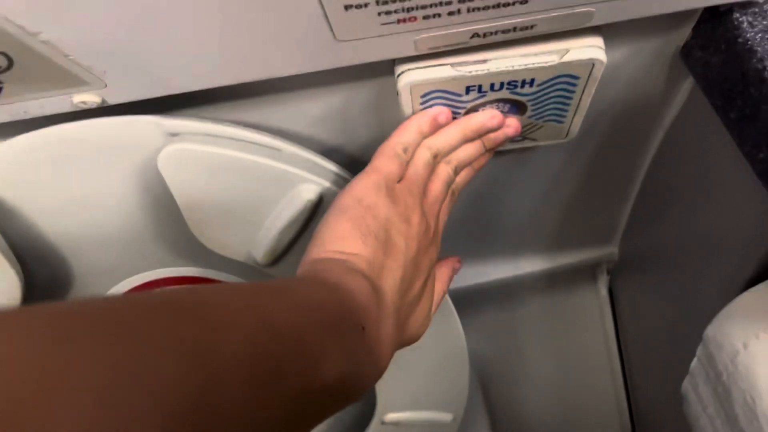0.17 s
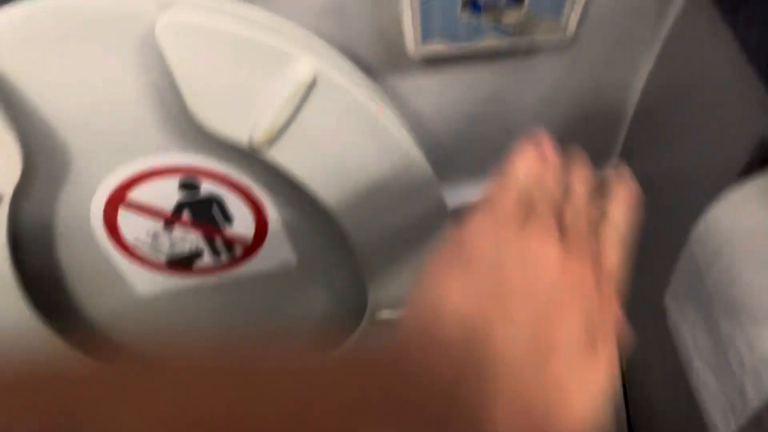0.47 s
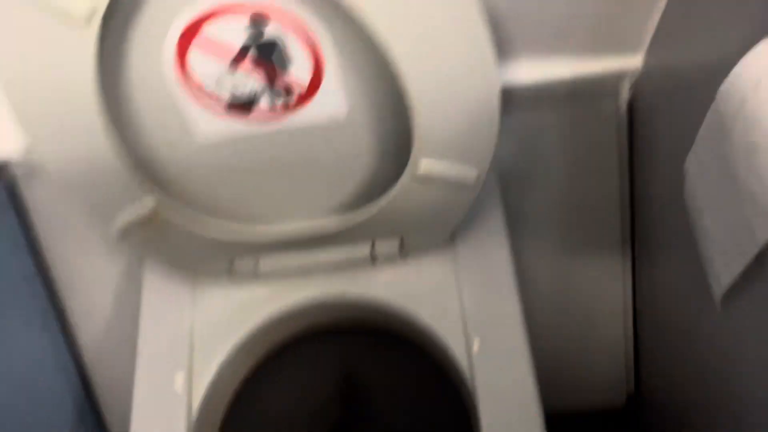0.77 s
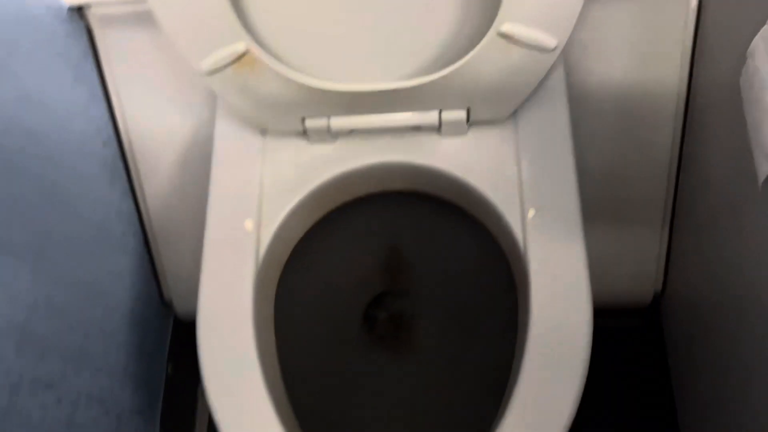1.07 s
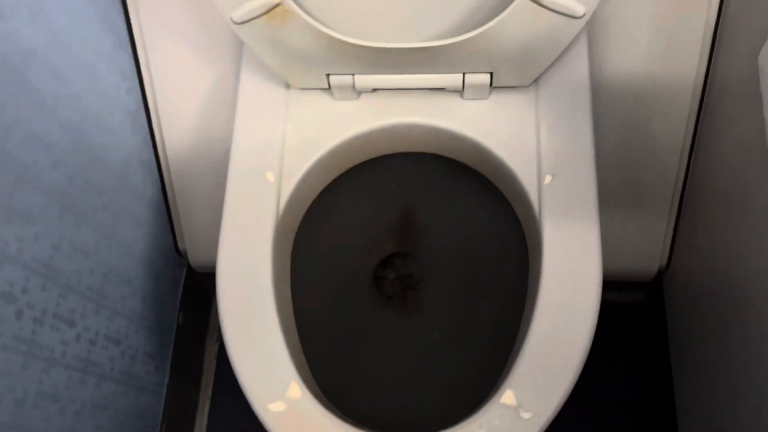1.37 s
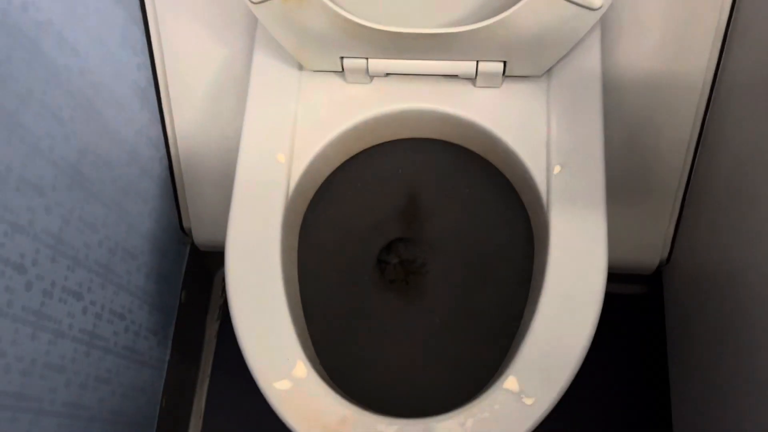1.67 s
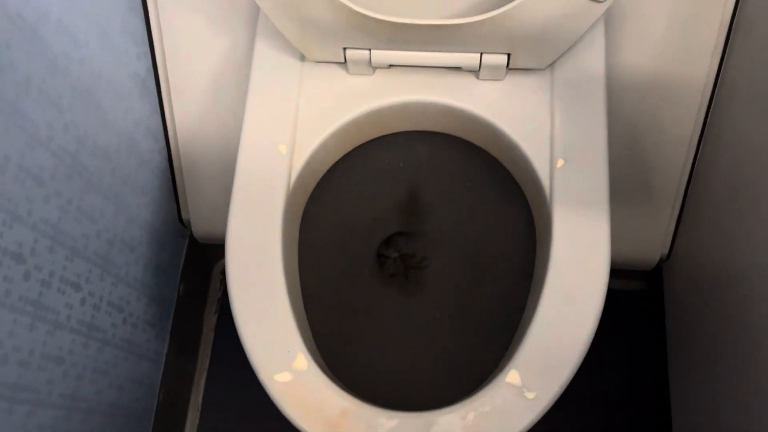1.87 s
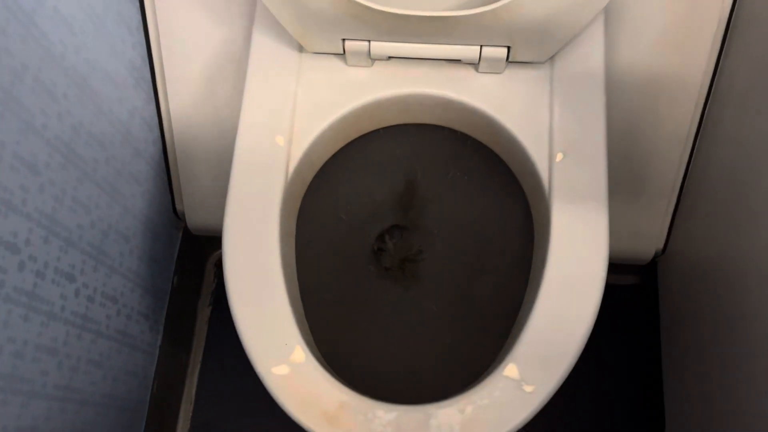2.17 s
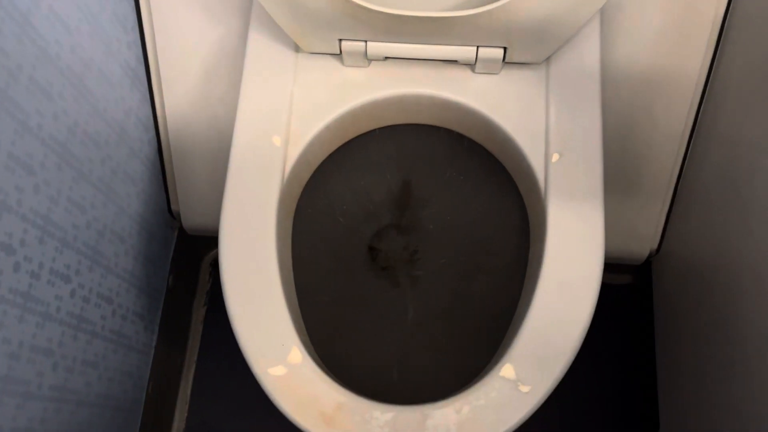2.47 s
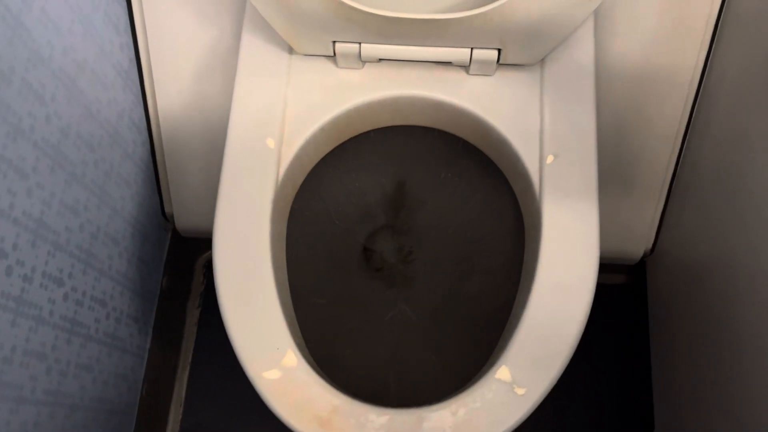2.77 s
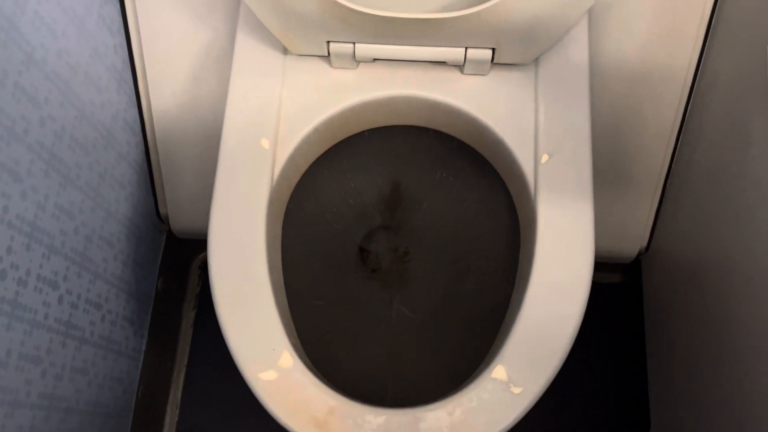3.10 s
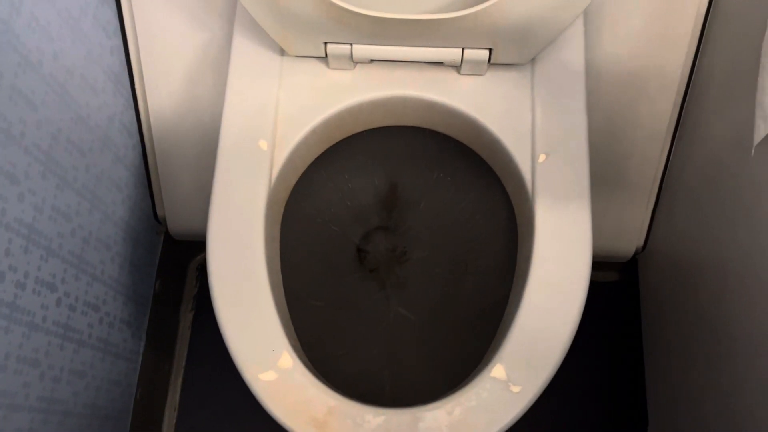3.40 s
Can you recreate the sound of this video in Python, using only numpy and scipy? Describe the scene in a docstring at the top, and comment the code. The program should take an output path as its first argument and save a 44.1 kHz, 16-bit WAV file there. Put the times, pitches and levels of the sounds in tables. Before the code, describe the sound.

Vacuum toilet flush close to the microphone in a small airplane washroom; after a button press and a droning wait, a valve knocks, water hisses, the drain gulps, air rushes, and a valve thuds.

```python
"""A low cabin drone is heard first; then a vacuum toilet flushes in a small aircraft lavatory.
A button clicks in and out, the rinse valve knocks open and water sprays; the drain gulps,
air rushes down the pipe, and a valve thuds near the end. Drone, spray, air and gulp are
filtered noise with flickering bands; button and valve are decaying sines under noise bursts."""
import sys
import numpy as np
from scipy import signal
from scipy.fft import rfft, irfft
from scipy.io import wavfile
from scipy.ndimage import uniform_filter1d

SR = 44100
rng = np.random.default_rng(int(sys.argv[2]) if len(sys.argv) > 2 else 0)


def decibels_to_gain(level_db):
    """Convert a level in decibels to a linear amplitude gain (20 dB per decade)."""
    exponent = np.asarray(level_db, float) / 20
    return 10 ** exponent


def wav_out(sig):
    """Save sig, one row per channel (or a flat mono array), as 16-bit PCM at SR to the path in sys.argv[1]."""
    wavfile.write(sys.argv[1], SR, np.round(np.clip(np.atleast_2d(sig).T, -1, 1) * 32767).astype(np.int16))


N = 156114
TIME_S = np.arange(N) / SR
HZ = np.fft.rfftfreq(N, 1 / SR)

# Spectra give relative level.
# cabin spectrum: (frequency [Hz], level [dB per Hz])
DRONE_SPECTRUM = [(25, -10), (36, -5), (48, -8), (75, -1), (110, -7.5), (160, -12), (260, -24),
                  (420, -24.5), (700, -28), (1000, -33.5), (1400, -31.5), (2200, -39.5), (3500, -45),
                  (5000, -59.5), (7000, -63.5), (10000, -65), (14000, -76.5)]
# cabin resonances: (frequency [Hz], width [Hz], gain [dB])
CABIN_RESONANCES = [(80.9, 22.6, 7.5), (426, 22, 8), (1350, 180, 4)]
DRONE_DB, DRONE_WAVER_DB = -12.5, 0.6
BUMP_S, BUMP_DB, BUMP_HZ, BUMP_T60_S = 3.02, -0.5, 56, 0.7

# button pressed, let go: (time [s], touch level [dB], switch snap level [dB])
BUTTON_CLICKS = [(0.0565, -22.5, -20), (0.3004, -29.5, -42)]
# panel and cap modes: (frequency [Hz], level [dB], t60 [s])
BUTTON_MODES = [(210.7, 6.5, 0.45), (284, 0, 0.15), (480, -3, 0.055), (600, -5.5, 0.1), (810, -11, 0.079),
                (5100, -1, 0.015)]
# plastic crack spectrum: (frequency [Hz], level [dB per Hz])
BUTTON_CRACK_SPECTRUM = [(500, -1), (1000, -19), (2000, -15), (3500, -18.5), (5500, -24), (8000, -28),
                         (11000, -47), (14500, -60.5)]
BUTTON_CRACK_GAIN_DB, BUTTON_CRACK_T60_S, BUTTON_SNAP_DELAY_S = 6, 0.075, 0.009

# valve knocks: (time [s], ring level [dB], crack level [dB], air spit level [dB])
VALVE_KNOCKS = [(1.7099, -4, -18.5, -23), (3.413, 8.5, -6.5, -48)]
# valve housing modes: (frequency [Hz], level [dB], t60 [s])
VALVE_MODES = [(146, -12.5, 0.32), (314.6, -4, 0.12), (384, -2.5, 0.064), (793, -10.5, .08),
               (1444, -10, .06), (2300, -28, 0.058)]
# valve crack spectrum: (frequency [Hz], level [dB per Hz])
VALVE_CRACK_SPECTRUM = [(400, 7.5), (900, -1), (2000, -5.5), (3500, -10.5), (5500, -15.5), (8000, -16)]
# air spit spectrum: (frequency [Hz], level [dB per Hz])
VALVE_SPIT_SPECTRUM = [(6000, -7), (8000, -12), (9800, 6.5), (12000, -17), (15000, -22)]
VALVE_PUSH_S, VALVE_CRACK_T60_S, VALVE_SPIT_T60_S = 0.009, 0.09, 0.06

# spray force: (time [s], level [dB])
RINSE_FORCE = [(1.74, -49.5), (1.77, -44), (1.87, -31), (1.96, -21.5), (2.07, -21), (2.14, -24), (2.3, -20),
               (2.35, -16), (2.39, -24.5), (2.55, -22.5), (2.72, -21), (2.9, -23.5), (3.4, -25.5),
               (3.54, -27.5)]
# spray spectrum: (frequency [Hz], level [dB per Hz])
SPRAY_SPECTRUM = [(1500, -11.5), (2300, -8), (3300, -8), (4700, -10.5), (6500, -7.5), (8500, -4.5),
                  (11000, -6.5), (13500, -9.5), (15500, -11)]

# air flow: (time [s], level [dB])
SUCTION_FLOW = [(2.1, -51), (2.2, -29.5), (2.3, -19.5), (2.5, -15), (2.7, -16), (2.9, -18), (3.4, -20),
                (3.54, -21.5)]
# moving air spectrum: (frequency [Hz], level [dB per Hz])
AIR_SPECTRUM = [(200, -14), (420, -8.5), (650, -3.5), (800, -2.5), (900, -27), (1050, -1), (1600, -7.5),
                (2300, -13), (2600, -11.5), (3600, -17.5), (3900, -32), (4600, -20.5), (6000, -19.5),
                (9000, -24)]
# bowl and pipe resonances: (frequency [Hz])
PIPE_HZ = [235, 412, 1000, 1495, 1970, 2270, 2870, 3190, 3600, 4830, 6000, 6380]
# the same resonances, in order: (width [Hz], gain [dB])
PIPE_WIDTH_GAIN = [(50.7, 8), (21.2, 12.5), (34.3, 10), (34.8, 11), (79.6, 8), (45, 11), (44.8, 3),
                   (55, 11), (40.3, 9.5), (50.6, 14.5), (60, 8.5), (80, 6.5)]

# water torn into the drain: (time [s], level [dB], centre [Hz])
GULP_PATH = [(2.28, -50, 3200), (2.312, -19, 2800), (2.33, -7, 2480), (2.36, -1.5, 1670),
             (2.385, 0.5, 1020), (2.41, -4, 690), (2.435, 0.5, 600), (2.452, -5, 600), (2.472, -1, 457),
             (2.5, -8, 343), (2.53, -28, 298)]
# gulp spectrum: (frequency [Hz], level [dB per Hz])
GULP_SPECTRUM = [(170, 9), (230, 1), (320, -2.5), (700, -5), (1200, -5), (2200, -12.5), (3700, -17.5),
                 (4200, -20.5), (7000, -16.5), (14000, -24.5)]
GULP_HIGH_FALL_DB_PER_OCT, GULP_LOW_FALL_DB_PER_OCT, GULP_LUMP_DB = 4.5, 5, 2.5

# channel phase and likeness: (frequency [Hz], right lead [half-turns], likeness [0-1]); stretches at whole
# half-turns with full likeness keep the two sides exactly in or out of step
PORTS = [(0, .03, .995), (150, .08, .99), (350, .06, .94), (480, .18, .9), (630, .28, .5), (700, -.2, .3),
         (830, -.45, .45), (900, -.8, .5), (970, -.25, .6), (1010, -.25, .6), (1060, -.45, .5),
         (1150, -.55, .4), (1290, -.6, .35), (1380, -1.3, .4), (1450, -.45, .5), (1520, -.33, .6),
         (1570, -1.2, .5), (1650, -.5, .3), (1720, 0, .7), (2300, -.1, .8), (2450, -.35, .7),
         (3000, -.35, .7), (3600, -.17, .65), (5000, -.17, .7), (5600, .3, .45), (6700, .25, .6),
         (7300, .72, .6), (7650, 1, 1), (8850, 1, 1), (9200, 1.1, .7), (10500, 1.7, .6), (11100, 2, 1),
         (13050, 2, 1), (13700, 2.4, .55), (14550, 3, 1), (22050, 3, 1)]
NEAR_SCATTER_DB = -5  # bowl side: scattered row of valve, water and air
MIC_BASS_CUT_HZ, CEILING = 36, 1.1
AGC_FROM_DB, AGC_SHARE, AGC_FALL_DB_PER_S = -25, 0.55, 30
AGC_ATTACK_S, AGC_BASS_CUT_HZ = 0.07, 300


def rms_one(x):
    """Scale to unit rms."""
    return x / np.sqrt(np.mean(x ** 2) + 1e-20)


def in_time(rows, before=-120):
    """Columns joined linearly in time; `before` holds ahead of the first row."""
    times_s, *columns = np.transpose(rows)
    return [np.interp(TIME_S, times_s, column, left=before) for column in columns]


def drift(rate_hz):
    """Unit-rms slow noise: two equal poles at rate_hz, run at SR / 40."""
    r = np.exp(-80 * np.pi * rate_hz / SR)
    white = rng.standard_normal(N // 40 + 2002)
    slow = signal.lfilter([1], [1, -2 * r, r * r], white)[2000:]
    return np.interp(np.arange(N) / 40, np.arange(len(slow)), rms_one(slow))


def humps(peaks):
    """Gain by frequency of resonances (frequency [Hz], width [Hz], gain [dB])."""
    return decibels_to_gain(sum(db / (1 + (2 * (HZ - hz) / width_hz) ** 2) for hz, width_hz, db in peaks))


def noise(spectrum, gain=1):
    """Spectrum of two unrelated noises, falling steeply outside the table."""
    hz, db = np.transpose(spectrum)
    hz = np.r_[hz[0] / 2, hz, hz[-1] * 1.2]
    db = np.r_[db[0] - 30, db, db[-1] - 30]
    shape = decibels_to_gain(np.interp(np.log(HZ + 1), np.log(hz), db))
    return rfft(rng.standard_normal((2, N))) * shape * gain


def patchy(spec, patchy_db, rate_hz, tilt=None):
    """Overlapping octave-wide bands flicker, partly together; tilt(octave) adds dB in time."""
    out, octave, shared = 0, np.log2(HZ + 1), drift(rate_hz)
    for centre in np.arange(5, 14.6, 0.5):
        weight = np.clip(1 - 2 * np.abs(octave - centre), 0, 1)
        band = irfft(spec * weight, N)
        flicker_db = patchy_db * (0.6 * shared + drift(rate_hz))
        tilt_db = tilt(centre) if tilt else 0
        out = out + band * decibels_to_gain(flicker_db + tilt_db)
    return out


def dying(start_s, db, t60_s):
    """Envelope with a 1.5 ms rise at start_s and exponential decay."""
    t = TIME_S - start_s
    return decibels_to_gain(db - 60 * np.maximum(t, 0) / t60_s) * np.clip(t / 0.0015, 0, 1)


def drone():
    """Engines and airflow through the hull: resonant noise, plus one low decaying sine."""
    spec = noise(DRONE_SPECTRUM, humps(CABIN_RESONANCES))
    body = rms_one(patchy(spec, DRONE_WAVER_DB, rate_hz=3.0))
    sine = np.sin(2 * np.pi * BUMP_HZ * (TIME_S - BUMP_S))
    bump = dying(BUMP_S, BUMP_DB, BUMP_T60_S) * sine
    return decibels_to_gain(DRONE_DB) * body + bump * [[1], [0]]


def button():
    """Plastic cracks at touch and snap; panel and cap ring as decaying modes."""
    crack, out = rms_one(irfft(noise(BUTTON_CRACK_SPECTRUM), N)), 0
    for start_s, touch_db, snap_db in BUTTON_CLICKS:
        t = TIME_S - start_s
        ring = sum(dying(start_s, touch_db + db, t60_s) * np.sin(2 * np.pi * hz * t)
                   for hz, db, t60_s in BUTTON_MODES)
        touch = dying(start_s, touch_db + BUTTON_CRACK_GAIN_DB, BUTTON_CRACK_T60_S)
        snap = dying(start_s + BUTTON_SNAP_DELAY_S, snap_db + BUTTON_CRACK_GAIN_DB, BUTTON_CRACK_T60_S)
        out = out + (touch + snap) * crack + ring * [[1], [0.3]]
    return out


def valve():
    """A soft blow rings the housing modes; a crack and a spit of air ride on top."""
    crack = rms_one(irfft(noise(VALVE_CRACK_SPECTRUM), N))
    spit = rms_one(irfft(noise(VALVE_SPIT_SPECTRUM), N))
    out = 0
    for start_s, ring_db, crack_db, spit_db in VALVE_KNOCKS:
        t = np.maximum(TIME_S - start_s, 0)
        rise = (1 - np.exp(-t / VALVE_PUSH_S)) ** 2
        ring = sum(dying(start_s, ring_db + db, t60_s) * np.sin(2 * np.pi * (hz * t + rng.random()))
                   for hz, db, t60_s in VALVE_MODES)
        out = out + rise * ring * [[1], [0.3]]
        out = out + dying(start_s, crack_db, VALVE_CRACK_T60_S) * crack
        out = out + dying(start_s, spit_db, VALVE_SPIT_T60_S) * spit
    return out


def rinse():
    """Jets of water hiss on the bowl: flickering noise follows the spray force."""
    force_db, = in_time(RINSE_FORCE)
    return decibels_to_gain(force_db) * rms_one(patchy(noise(SPRAY_SPECTRUM), patchy_db=0.6, rate_hz=36.0))


def pipe():
    """Gain by frequency of the bowl and pipe resonances."""
    return humps([(hz, *row) for hz, row in zip(PIPE_HZ, PIPE_WIDTH_GAIN)])


def suction():
    """Air drawn through bowl and pipe: flow noise coloured by their resonances."""
    flow_db, = in_time(SUCTION_FLOW)
    return decibels_to_gain(flow_db) * rms_one(patchy(noise(AIR_SPECTRUM, pipe()), patchy_db=0.9, rate_hz=6.8))


def gulp():
    """A lumpy roar whose centre sinks as the drain opens, coloured by the pipe."""
    level_db, centre_hz = in_time(GULP_PATH)
    centre = np.log2(np.maximum(centre_hz, 100))

    def tilt(octave):
        """Loss [dB] either side of the moving centre."""
        above = np.maximum(octave - centre, 0)
        below = np.maximum(centre - octave, 0)
        return -GULP_HIGH_FALL_DB_PER_OCT * above - GULP_LOW_FALL_DB_PER_OCT * below

    roar = patchy(noise(GULP_SPECTRUM, pipe()), GULP_LUMP_DB, rate_hz=50.0, tilt=tilt)
    running_rms = np.sqrt(uniform_filter1d(np.mean(roar ** 2, axis=0), size=2500) + 1e-20)
    return decibels_to_gain(level_db) * roar / running_rms


def scene():
    """Row 0 is the sound both ports share, row 1 the scattered part."""
    near = valve() + rinse() + suction() + gulp()
    return drone() + button() + near * decibels_to_gain(np.array([[0], [NEAR_SCATTER_DB]]))


def band_limit(x):
    """A steep low-pass at the top of the band."""
    return signal.sosfilt(signal.butter(12, 14970, fs=SR, output="sos"), x)


def record(dry):
    """Port phase and likeness, bass cut, gain control driven above the bass, soft ceiling."""
    hz, half_turns, likeness = np.transpose(PORTS)
    turn = np.exp(0.5j * np.pi * np.interp(HZ, hz, half_turns))  # half the lead to each side
    alike = np.clip(np.interp(HZ, hz, likeness), 0, 1)
    bass_cut = HZ ** 2 / np.hypot(HZ ** 2, MIC_BASS_CUT_HZ ** 2)
    shared, scattered = rfft(dry) * bass_cut * np.sqrt([(1 + alike) / 2, (1 - alike) / 2])
    stereo = irfft([(shared + scattered) / turn, (shared - scattered) * turn], N)

    high_pass = signal.butter(2, AGC_BASS_CUT_HZ, "high", fs=SR, output="sos")
    heard = signal.sosfilt(high_pass, stereo)
    level_db = 10 * np.log10(uniform_filter1d(np.mean(heard ** 2, axis=0), size=800) + 1e-12)
    fall_db = AGC_FALL_DB_PER_S * TIME_S
    held_db = np.maximum.accumulate(level_db + fall_db) - fall_db  # peak hold, falling steadily
    over_db = np.maximum(held_db - AGC_FROM_DB, 0)
    r = np.exp(-1 / (AGC_ATTACK_S * SR))
    stereo = stereo * decibels_to_gain(-AGC_SHARE * signal.lfilter([1 - r], [1, -r], over_db))
    return band_limit(CEILING * np.tanh(stereo / CEILING))


dry = scene()
out = record(dry)
wav_out(out)
```